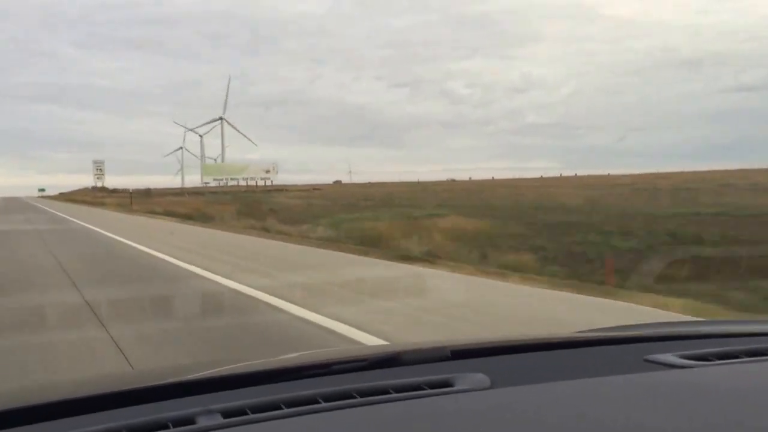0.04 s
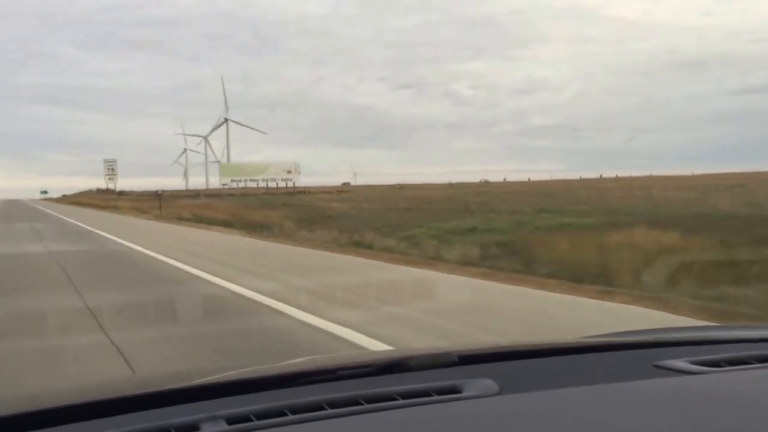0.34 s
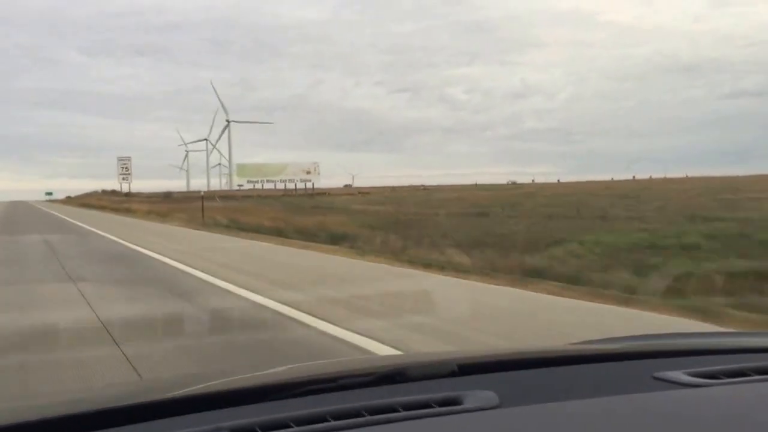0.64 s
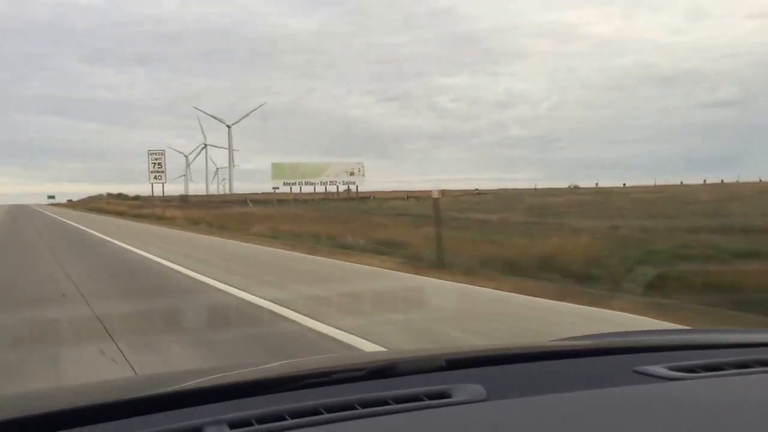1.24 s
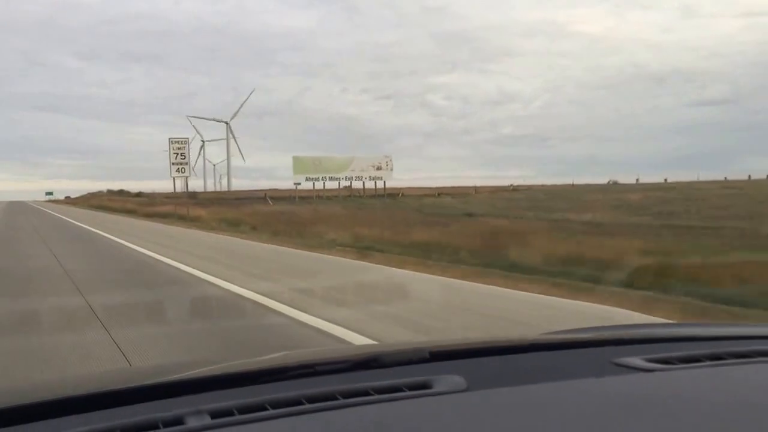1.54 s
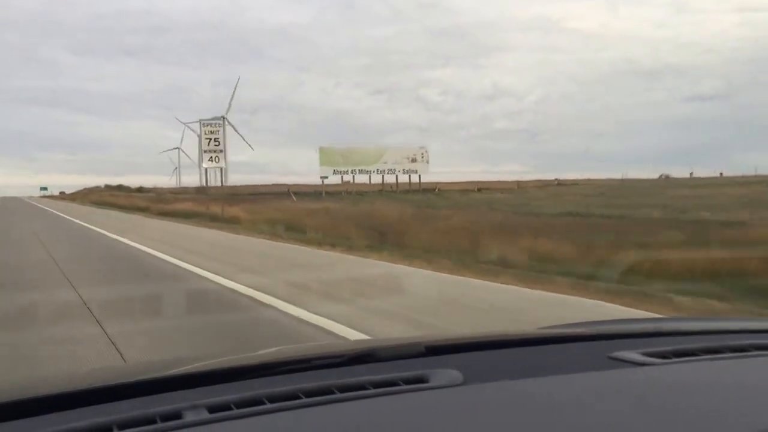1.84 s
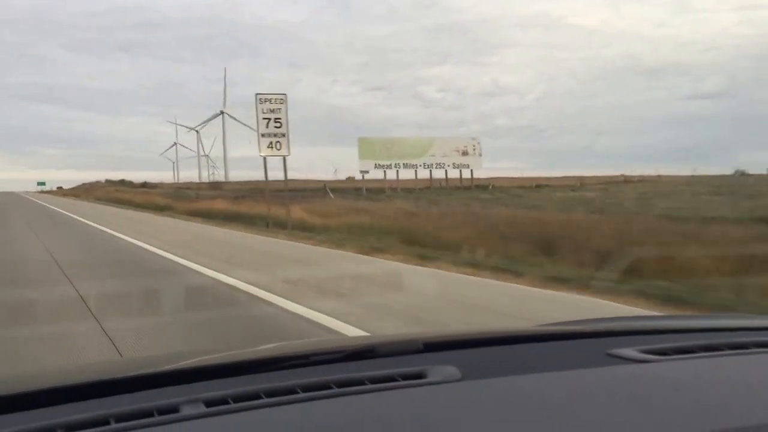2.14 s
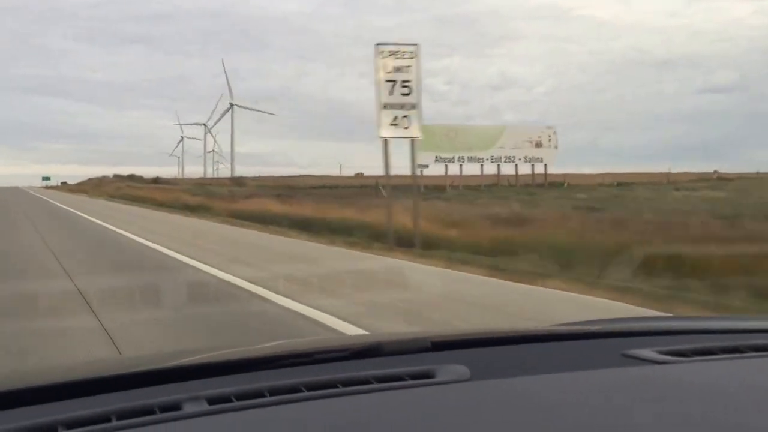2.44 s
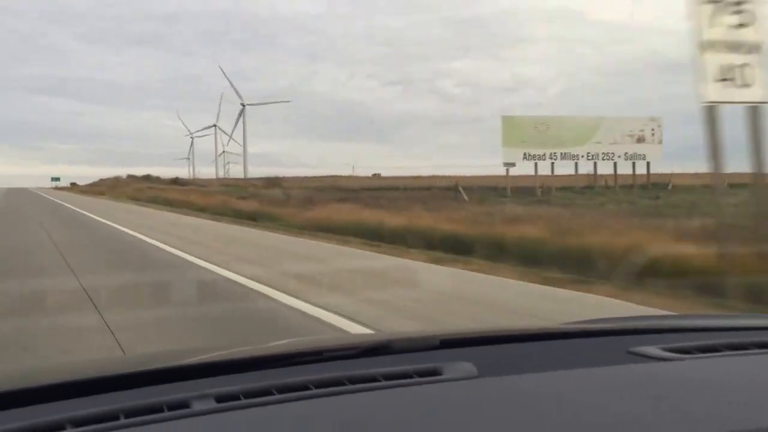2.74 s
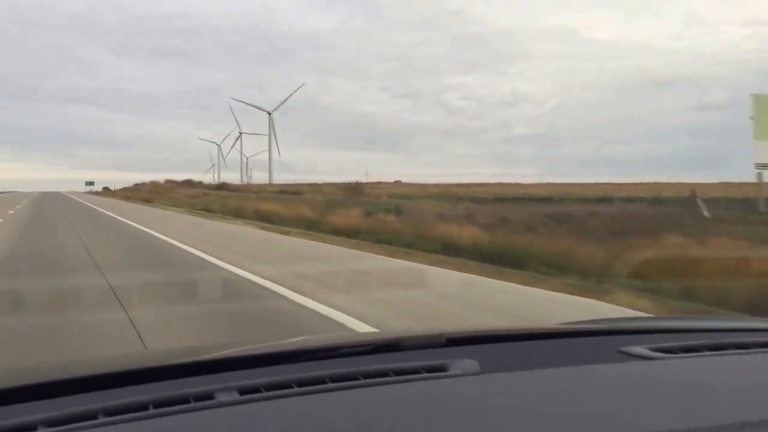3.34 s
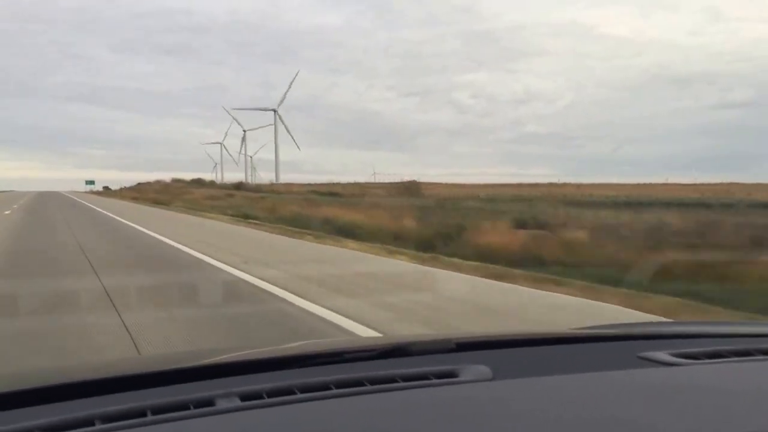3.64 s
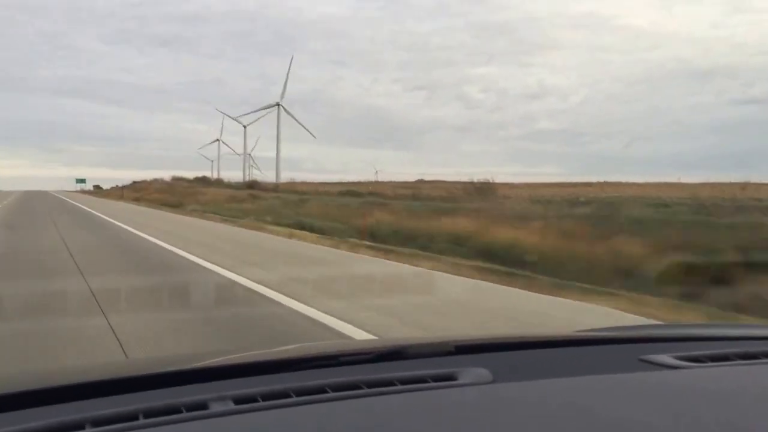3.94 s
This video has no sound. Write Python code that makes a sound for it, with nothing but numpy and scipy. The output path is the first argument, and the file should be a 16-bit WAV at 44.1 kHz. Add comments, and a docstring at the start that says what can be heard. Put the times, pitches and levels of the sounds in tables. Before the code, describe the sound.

Steady deep road rumble and muffled wind inside a car cruising on a highway.

```python
"""Inside a car cruising at steady speed on a highway.
From the start the road shakes the body into a deep rumble that swells over bumps, and the wheels add
a wavering drone. Wind and tread roar come dulled through the glass; a tread hum comes and goes.
Around 1.2 s a stretch of pavement makes the air in the tires ring harder.
Near 3.1 s the trim gives one tiny tick."""
import sys
import numpy as np
from scipy import signal
from scipy.fft import rfft, irfft
from scipy.io import wavfile
from scipy.ndimage import uniform_filter1d

SR = 44100
rng = np.random.default_rng(int(sys.argv[2]) if len(sys.argv) > 2 else 0)


def generate_wav(sig):
    """Save sig (samples, or channels by samples) to the path in sys.argv[1] as 16-bit PCM at SR."""
    pcm = np.round(np.clip(np.atleast_2d(sig).T, -1, 1) * 32767).astype(np.int16)
    wavfile.write(sys.argv[1], SR, pcm)


N = 176400
TIME_S = np.arange(N) / SR
BIN_HZ = np.maximum(np.arange(N // 2 + 1) * SR / N, 1)


def from_db(db):
    """Decibels to gain."""
    return 10 ** (np.asarray(db) / 20)


def unit_rms(x):
    """Scale to rms 1."""
    return x / np.sqrt(np.mean(x ** 2) + 1e-20)


def drift(rate_hz):
    """Slow random wander, spread 1."""
    hop, settle = 40, 2000
    pole = np.exp(-2 * np.pi * rate_hz * hop / SR)
    white = rng.standard_normal(N // hop + settle + 2)
    slow = signal.lfilter([1], [1, -2 * pole, pole * pole], white)[settle:]
    return np.interp(np.arange(N) / hop, np.arange(len(slow)), unit_rms(slow - slow.mean()))


def swing(curve):
    """Level curve in dB, mean removed."""
    db = np.interp(TIME_S, *np.transpose(curve))
    return db - db.mean()


def bell(centre_s, half_s):
    """Gaussian swell, height 1."""
    return np.exp(-((TIME_S - centre_s) / half_s) ** 2)


def below(x, edge_hz):
    """Steep zero-phase low-pass."""
    return irfft(rfft(x) / (1 + (BIN_HZ / edge_hz) ** 12), N)


def noise(gain):
    """Random-phase noise; gain in amplitude per root Hz."""
    phase = 2 * np.pi * rng.random(N // 2 + 1)
    return irfft(gain * np.exp(1j * phase), N) * np.sqrt(N * SR / 2)


def shaped_noise(spectrum):
    """Noise through (freq_hz, density_db) points, falling steeply above the last."""
    hz, db = np.transpose(spectrum)
    rolloff = np.minimum(1, hz[-1] / BIN_HZ) ** 4
    return noise(from_db(np.interp(np.log(BIN_HZ), np.log(hz), db)) * rolloff)


def ringing(pitch_hz, half_width_hz):
    """Noise-driven resonance, rms 1."""
    return unit_rms(noise(1 / (1 + ((BIN_HZ - pitch_hz) / half_width_hz) ** 2)))


def steadied(x, share, over_s):
    """Even out a share of a noise's chance swells; rms kept."""
    power = uniform_filter1d(x ** 2, int(over_s * SR / 2))
    power = uniform_filter1d(power, int(over_s * SR)) + 1e-20
    return unit_rms(x * power ** (-share / 2)) * x.std()


def cabin_reflections(x, count=16, latest_s=0.014, echo_db=-13.5):
    """Early echoes off glass and dashboard ripple the spectrum; rms kept."""
    lateness, polarity = rng.random((count, 2)).T
    delay_s = (0.15 + 0.85 * lateness) * latest_s
    echoes = np.zeros(N)
    echoes[(delay_s * SR).astype(int)] = np.sign(polarity - 0.5) / np.sqrt(count)
    response = 1 + from_db(echo_db) * rfft(echoes)
    return unit_rms(irfft(rfft(x) * response, N)) * x.std()


# Wind spectrum: freq_hz, density_db
WIND_SPECTRUM = [(700, -87.5), (1500, -77.5), (2120, -79.5), (2400, -85), (2950, -86.5), (3300, -91),
                 (4100, -93.5), (4850, -100.5), (5400, -99.3), (6300, -109.5), (7500, -114), (9700, -114.7),
                 (10400, -123), (11100, -118.5), (15700, -124)]
# Hiss level curve: time_s, relative_db
HISS_CURVE = [(0, 0.1), (.65, 0), (1.37, 0.8), (1.78, -1.3), (2.17, .4), (2.55, -0.8), (3.05, 0.7),
              (3.4, -1), (3.68, 1), (4, -0.5)]

def wind(hiss_edge_hz=3300, flutter_db=0.8, gust_db=0.92, trim_db=0.01):
    """Air rushes over windscreen and doors in faint gusts; its hiss flutters on its own."""
    air = cabin_reflections(shaped_noise(WIND_SPECTRUM))
    rush = below(air, hiss_edge_hz)
    hiss_db = swing(HISS_CURVE) + flutter_db * drift(rate_hz=24)
    rush_db = gust_db * drift(rate_hz=16)
    return from_db(trim_db) * (from_db(rush_db) * rush + from_db(hiss_db) * (air - rush))


# Modes of the trim: pitch_hz, level_db
TRIM_MODES = [(9600, -54), (12200, -50)]

def trim_tick(start_s=3.1476, click_t60_s=0.0016, tail_db=-73, tail_t60_s=0.09):
    """The trim ticks once, high and quickly damped, with a faint cabin tail."""
    age_s = np.maximum(TIME_S - start_s, 0)
    click = sum((-1) ** k * from_db(db - 60 * age_s / click_t60_s) * np.sin(2 * np.pi * hz * age_s)
                for k, (hz, db) in enumerate(TRIM_MODES))
    tail_gain = (age_s > 0) * from_db(tail_db - 60 * age_s / tail_t60_s)
    return click + tail_gain * ringing(pitch_hz=11000, half_width_hz=800 * 2)


# Tread hum level curve: time_s, relative_db
HUM_CURVE = [(0, -1.5), (.15, 5), (.42, 5.5), (.7, -5), (.84, 4.5), (.99, -5), (1.2, 8), (1.32, 0.5),
             (1.47, 5.5), (1.64, -6), (2.48, 1.5), (2.88, -5), (3.07, 6.5), (3.45, -7), (3.86, 7), (4, 0)]

def tread_hum(base_db=-46):
    """A narrow hum of the tread comes and goes with the surface."""
    hum = steadied(ringing(pitch_hz=375.4, half_width_hz=8), share=0.8, over_s=0.085)
    return from_db(base_db + swing(HUM_CURVE)) * hum


# Tread roar spectrum: freq_hz, density_db
ROAR_SPECTRUM = [(300, -79), (520, -69.5), (640, -71.5), (700, -75), (745, -69.5), (1180, -71), (1350, -83),
                 (2200, -87.5), (4000, -115)]
# Tread roar level curve: time_s, relative_db
ROAR_CURVE = [(0, -2.3), (.17, 0.5), (.35, 0.5), (.8, -0.5), (1.0, -1.7), (1.3, 0.2), (1.41, 2.2),
              (1.6, -1.3), (1.85, 1), (2.35, -0.7), (2.6, 1.3), (2.72, -1), (3.3, 1), (3.55, 1), (4, -.2)]

def tread_roar(patchy_db=1.02, trim_db=-0.45):
    """Tread roars on concrete, varying a little with the surface."""
    surface_db = swing(ROAR_CURVE) + patchy_db * drift(rate_hz=12)
    roar = steadied(shaped_noise(ROAR_SPECTRUM), share=0.84, over_s=0.16)
    return from_db(trim_db + surface_db) * roar


def tire_air(base_db=-46.5, swell_db=13):
    """The air in the tires rings, swelling once as the pavement changes."""
    ring = steadied(ringing(pitch_hz=228.2, half_width_hz=7), share=0.9, over_s=0.12)
    return from_db(base_db + swell_db * bell(centre_s=1.22, half_s=0.26)) * ring


# Wheel harmonics: order, level_db
WHEEL_HARMONICS = [(3, -36), (7, -38)]

def wheel_drone(turns_per_s=16.9, speed_spread=0.0037, waver_db=-1):
    """Slightly uneven tires hum at multiples of their turning rate."""
    turns = np.cumsum(turns_per_s * (1 + speed_spread * drift(rate_hz=1))) / SR
    drone = np.zeros(N)
    for order, level_db in WHEEL_HARMONICS:
        waver = from_db(waver_db * drift(rate_hz=2.8))
        tone = np.sin(2 * np.pi * (order * turns + rng.random()))
        drone += from_db(level_db) * unit_rms(waver * tone)
    return drone


# Modes of cabin, panels and glass: pitch_hz, half_width_hz, level_db
CABIN_MODES = [(53, 8.1, -32.5), (60, 3.3, -37.5), (138.5, 7, -36.5), (170.4, 5, -47), (184.7, 4.9, -44.5),
               (982, 17, -55), (1145, 14, -59), (1310, 9, -62), (1695, 18, -63), (2073, 13, -63),
               (2530, 68, -72), (4000, 36, -79.5), (4550, 38, -80.5)]

def cabin_resonances():
    """Road and wind keep the narrow modes ringing."""
    return sum(from_db(db) * ringing(hz, half_width_hz) for hz, half_width_hz, db in CABIN_MODES)


# Road rumble spectrum: freq_hz, density_db
RUMBLE_SPECTRUM = [(10, -74), (25, -71.5), (33, -55.5), (45, -44.5), (68, -44), (92, -43), (120, -45.5),
                   (129, -50), (142, -48), (155, -55.5), (185, -51), (225, -57), (265, -58.5), (390, -61),
                   (470, -68), (700, -79.5)]
# Pavement bumps: centre_s, deep_db, boom_db
ROAD_BUMPS = [(0.16, 4, 0.5), (0.60, 3.5, -0.5), (0.72, 0.5, 1), (0.83, 0.5, 6), (0.90, 2, 6),
              (1.14, 9, 1.5), (1.54, 9, 1.5), (1.80, 6, -2), (1.91, 3.5, -1.5), (2.06, 1, 6.5),
              (2.18, 6, 2.5), (2.31, -3, 6.5), (2.42, 3.5, 2.5), (2.67, 6.5, 3.5), (3.11, -7, 3),
              (3.25, 7.5, -0.5), (3.43, 0, 5), (3.52, 2.5, 4.5), (3.61, 1.5, -1.5), (3.74, 7.5, 3.5),
              (3.85, 5.5, 5)]
# Smooth pavement: centre_s, half_s, deep_db, boom_db
ROAD_LULLS = [(.3, .08, -3.5, -0.5), (1.074, .025, -5, -0.5), (1.238, .06, -8, 0), (1.414, .025, -4.5, 0),
              (1.9, .1, 0, -2.5), (2.92, 0.03, -9, -2)]

def cabin_rumble(deep_trim_db=-1, boom_trim_db=-1.04, body_trim_db=-0.4):
    """Road and wheels shake the body; the bass swells over bumps and sinks on smooth patches."""
    shake = shaped_noise(RUMBLE_SPECTRUM) + cabin_resonances() + wheel_drone()
    deep = below(shake, edge_hz=79.5)
    bass = below(shake, edge_hz=160)
    boom, body = bass - deep, shake - bass
    bumps = sum(np.outer(band_db, bell(centre_s, half_s=0.026)) for centre_s, *band_db in ROAD_BUMPS)
    lulls = sum(np.outer(band_db, bell(centre_s, half_s)) for centre_s, half_s, *band_db in ROAD_LULLS)
    deep_db, boom_db = bumps + lulls
    return (from_db(deep_trim_db + deep_db) * steadied(deep, share=0.85, over_s=0.12)
            + from_db(boom_trim_db + boom_db) * steadied(boom, share=0.8, over_s=0.13)
            + from_db(body_trim_db) * steadied(body, share=0.46, over_s=0.24))


def scene():
    """All sources at one microphone behind the dashboard."""
    return (cabin_rumble() + tire_air() + tread_hum() + tread_roar() + wind() + trim_tick())[None]


def record(dry, low_cut_hz=28, high_cut_hz=15750):
    """The microphone drops the lowest bass; the top is cut steeply."""
    thinned = dry - below(dry, low_cut_hz)
    padded = np.pad(thinned, ((0, 0), (2000, 0)), mode="reflect", reflect_type="odd")  # filter run-in
    low_pass = signal.ellip(12, 0.1, 80, high_cut_hz, fs=SR, output="sos")
    return signal.sosfilt(low_pass, padded)[:, -N:]


dry = scene()
out = record(dry)
generate_wav(out)
```